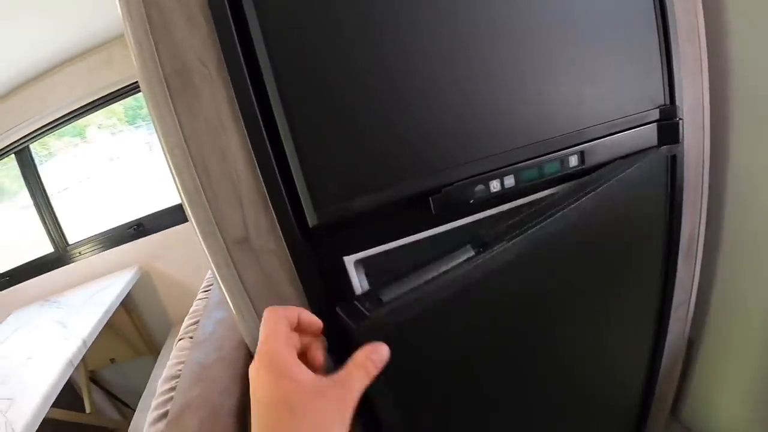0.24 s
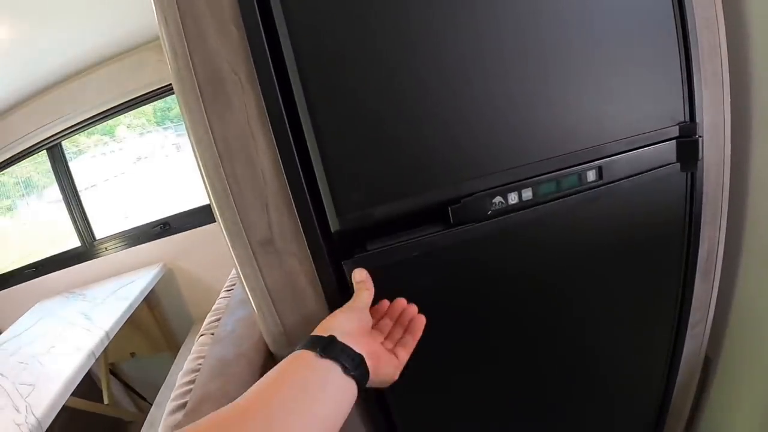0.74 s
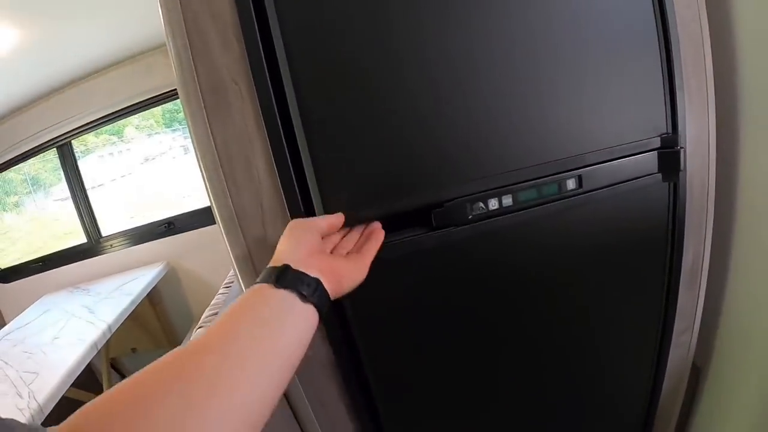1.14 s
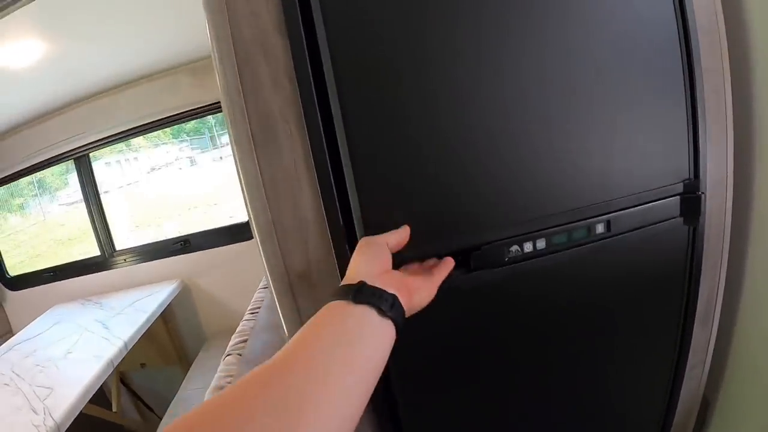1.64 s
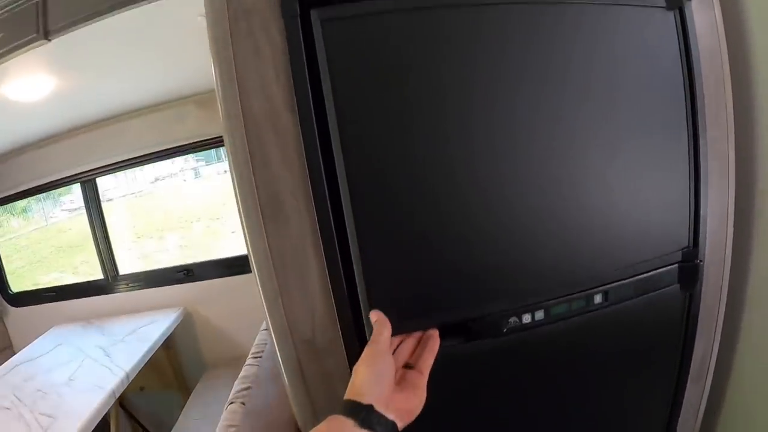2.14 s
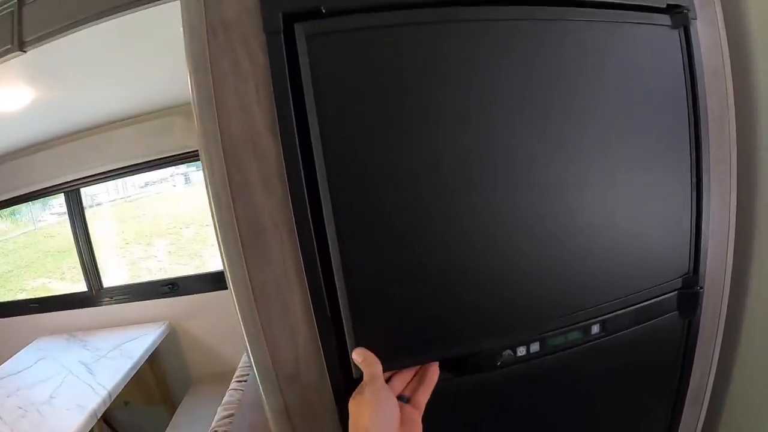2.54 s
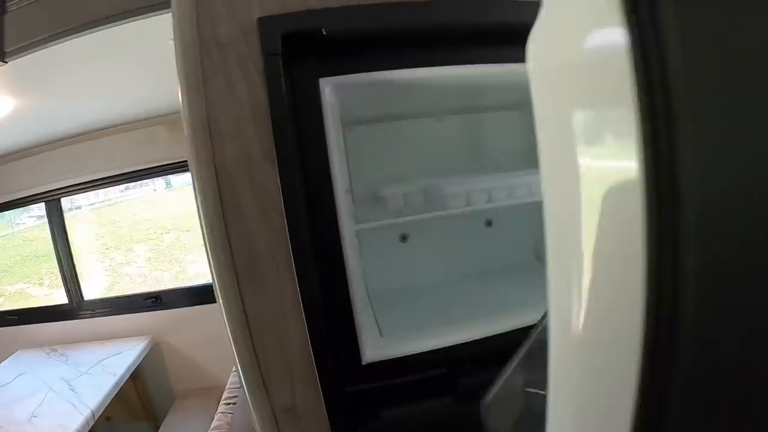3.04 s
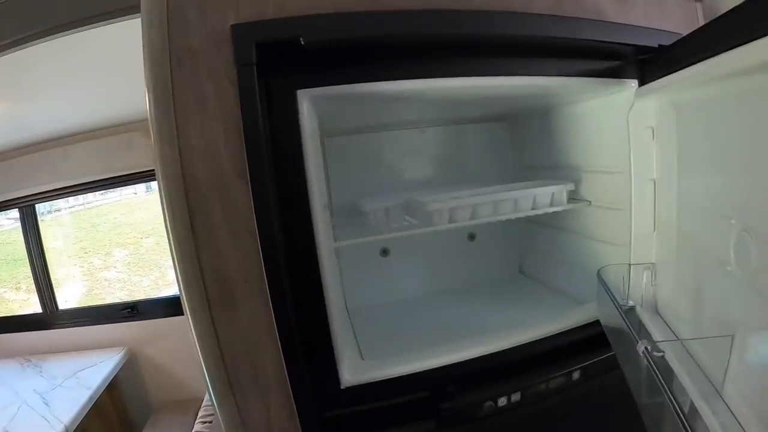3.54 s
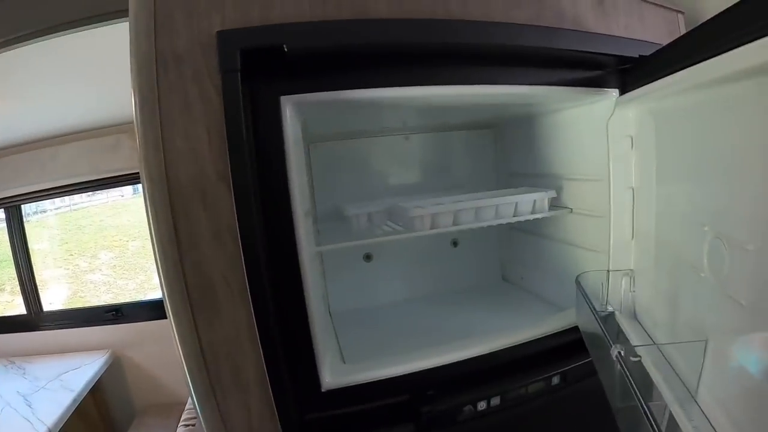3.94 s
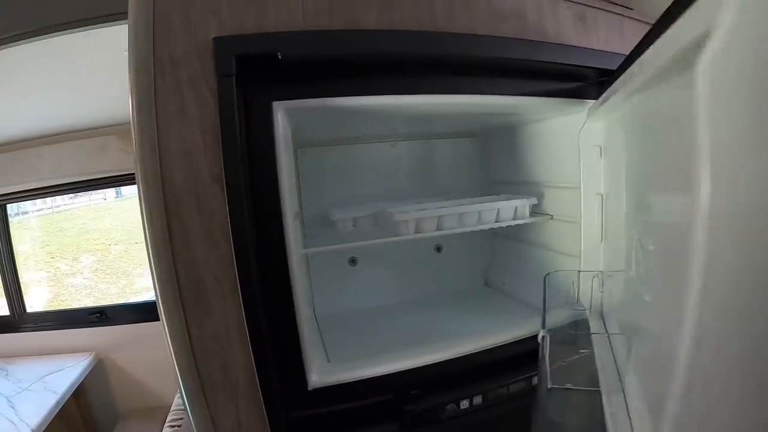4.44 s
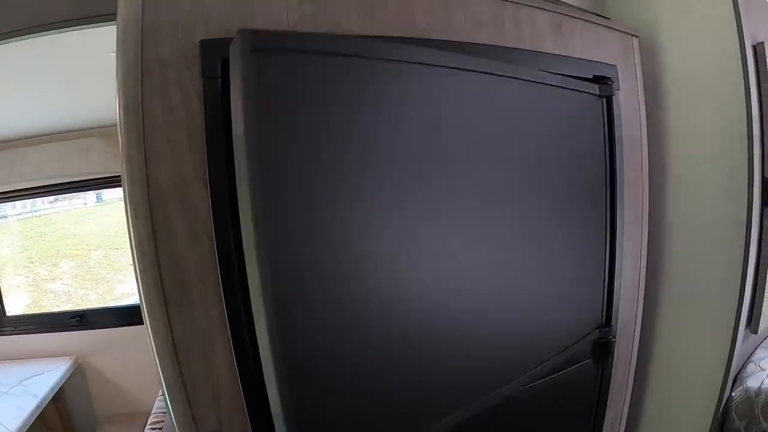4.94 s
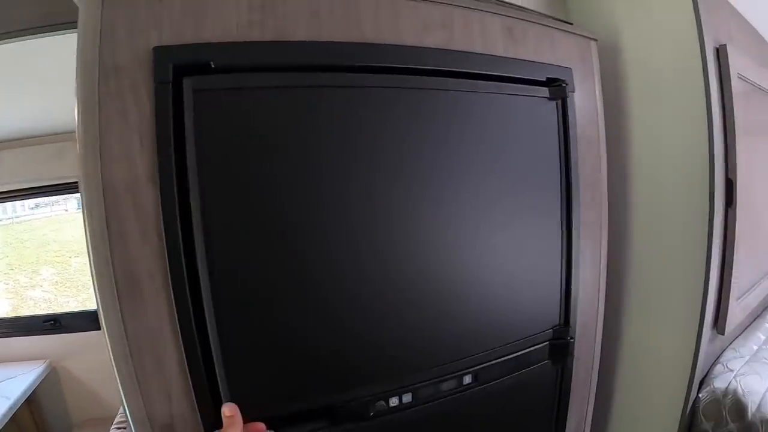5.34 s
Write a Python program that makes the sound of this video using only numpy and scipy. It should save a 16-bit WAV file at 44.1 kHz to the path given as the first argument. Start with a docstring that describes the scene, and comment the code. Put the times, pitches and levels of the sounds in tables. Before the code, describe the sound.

In a small, dry camper cabin, a fridge door closes with a soft thump and double latch clack. Fingers tap and scrape the plastic, a latch snaps, then a heavy clunk frees the freezer door. A quieter pause leaves low rumble and faint hum before a squeaky scrape, tap and sharp closing click. The stereo microphone is close, at arm's length.

```python
"""Fridge doors in a camper

A hand shuts the lower fridge door, lets the freezer latch snap, pulls that door open and shuts it again, at arm's length
in a small, dry cabin. Gaskets, panels and latches are noise bursts plus damped modes; knocks are sagging sines;
finger scrapes and squeaks are trains of slips feeding resonances. Moves rustle as shaped noise
over cabin air, a low rumble and two wavering tones."""
import sys
import numpy as np
from scipy import signal
from scipy.fft import rfft, irfft, next_fast_len
from scipy.io import wavfile
from scipy.ndimage import uniform_filter1d

SR = 44100
rng = np.random.default_rng(int(sys.argv[2]) if len(sys.argv) > 2 else 0)


def bounce(signal):
    """Save signal as a 16-bit WAV file at the path given by the first command-line argument."""
    frames = np.transpose(np.atleast_2d(signal))
    limited = np.clip(frames, -1, 1)
    pcm = np.round(limited * 32767).astype(np.int16)
    wavfile.write(sys.argv[1], SR, pcm)


N = 246127

TIME = np.arange(N) / SR
AGE = np.arange(next_fast_len(int(0.28 * SR), True)) / SR  # time since a contact
RELEASE = np.sin(np.pi / 2 * np.minimum(2 * (1 - AGE / AGE[-1]), 1)) ** 2  # fades the second half out

# parts of a blow, low to high: base range [Hz], base contact decay [s], cabin tail [dB, s],
# modes relative to the burst [dB], trim on the called level [dB]
PANEL_PART = dict(lo_hz=125, hi_hz=451.6, contact_t60=0.012, tail_db=-16.5, tail_t60=0.26, modes_db=3, trim_db=-0.5)
CLACK_PART = dict(lo_hz=808, hi_hz=2190, contact_t60=0.047, tail_db=-6.5, tail_t60=0.16, modes_db=-4, trim_db=-1.5)
SNAP_PART = dict(lo_hz=2120, hi_hz=5310, contact_t60=0.042, tail_db=-11, tail_t60=0.19, modes_db=-8.5, trim_db=-1.5)
EDGE_PART = dict(lo_hz=4600, hi_hz=8320, contact_t60=0.0099, tail_db=-16.5, tail_t60=0.17, modes_db=-18, trim_db=4.5)
# background whose air and low rumble change over time: (time [s], air level [dB], low rumble level [dB])
BACKGROUND_LEVELS = [(.45, -54.5, -38), (.9, -66.5, -41.5), (1.5, -56, -41.5), (3.2, -56.5, -43),
                     (4.12, -55, -44.5), (4.24, -55.5, -50.5), (4.68, -53, -46.5), (4.9, -52.5, -54)]


def undb(db):
    """Decibels to gain."""
    return 10 ** (np.asarray(db) / 20)


def curves(table):
    """Columns of a (time, ...) table interpolated at every sample."""
    s, *columns = np.transpose(table)
    return [np.interp(TIME, s, column) for column in columns]


def fade(t60_s):
    """Exponential decay of 60 dB in t60_s."""
    return np.exp(-np.log(1000) * AGE / t60_s)


def band(x, lo_hz, hi_hz, order):
    """Causal Butterworth band-pass."""
    hi_hz = np.clip(hi_hz, 1.1 * lo_hz, 0.45 * SR)
    return signal.sosfilt(signal.butter(order, [lo_hz, hi_hz], "band", fs=SR, output="sos"), x)


def diffuse(n, apart_hz, bass_side):
    """Noise from all around at two close ports: alike in the bass, unrelated in the treble."""
    mid, side = rng.standard_normal((2, n))
    share = np.clip(bass_side + np.fft.rfftfreq(n, 1 / SR) / apart_hz, 0, 1)
    side = irfft(rfft(side) * share, n)
    return np.array([mid + side, mid - side])


def wash(colour, apart_hz=2600, bass_side=0.036):
    """Diffuse noise of rms 1 with a (Hz, dB) colour, silent above its last point."""
    n = next_fast_len(N, True)
    hz, db = np.transpose(colour)
    log_hz = np.log(np.fft.rfftfreq(n, 1 / SR) + 1)
    gain = undb(np.interp(log_hz, np.log(hz), db, right=-np.inf))
    x = irfft(rfft(diffuse(n, apart_hz, bass_side)) * gain, n)[:, :N]
    return x / x.std()


def walk(rate_hz):
    """Smooth random drift of standard deviation 1."""
    k = int(SR / rate_hz)
    steps = np.repeat(rng.standard_normal(N // k + 1), k)
    x = uniform_filter1d(uniform_filter1d(steps, k), k)[:N]
    return x / x.std()


def crest(x, window_s):
    """Scale a sound so that its loudest window has rms 1."""
    power = np.mean(np.atleast_2d(x) ** 2, axis=0)
    loudest = uniform_filter1d(power, int(window_s * SR), mode="constant").max()
    return x / np.sqrt(loudest + 1e-18)


def add(out, s, x):
    """Mix a sound in at time s."""
    i = int(s * SR)
    out[:, i:i + x.shape[1]] += x[:, :N - i]


def in_cabin(x, db, t60_s):
    """A sound followed by the cabin's short diffuse tail."""
    cabin = diffuse(len(AGE), apart_hz=5500, bass_side=0.35) * fade(t60_s)
    cabin *= undb(db) / np.linalg.norm(cabin[0])
    cabin[:, 0] += 1  # direct sound
    return signal.fftconvolve(cabin, x[None])


def cabin_air():
    """Diffuse broadband noise whose level follows the background table."""
    # colour of the air: (frequency [Hz], level [dB])
    air_colour = [(120, -15.5), (200, 1), (259, -2), (394, -20), (696, -23), (883, -20.5), (986, -12),
                  (2960, -34), (5940, -44.5), (10300, -57.5), (16000, -98.5)]
    air_db, _ = curves(BACKGROUND_LEVELS)
    return wash(air_colour) * undb(air_db)


def wavering_tone(table, waver, flutter_db, trim_db=-2.5):
    """A sine that wavers in pitch (share) and level (dB), alike at both ports."""
    hz, db = curves(table)
    phase = 2 * np.pi * np.cumsum(hz * (1 + waver * walk(10.0))) / SR
    return np.sqrt(2) * np.sin(phase) * undb(db + flutter_db * walk(24) + trim_db)


def hums():
    """A low hum and a higher tone, each one wavering sine."""
    # low hum: (time [s], mean pitch [Hz], level before trim [dB])
    low_hum = [(0, 94.2, -46), (.9, 87.45, -52.5), (2.4, 96.2, -53.5), (3.2, 90, -51), (4.12, 85, -43),
               (4.235, 86, -60), (4.29, 105.5, -39), (4.5, 102.4, -45.5), (4.83, 103, -43.5),
               (4.89, 101.7, -69.5), (5.2, 107.8, -47.5), (5.58, 107.3, -43)]
    # higher tone, clearest near 3.3 s: (time [s], mean pitch [Hz], level before trim [dB])
    higher_tone = [(0, 256, -66.5), (2.4, 256.4, -60.5), (3.3, 243.8, -48.5), (3.9, 242.4, -52),
                   (4.3, 244, -70)]
    return (wavering_tone(low_hum, waver=0.012, flutter_db=1.6)
            + wavering_tone(higher_tone, waver=0.004, flutter_db=1.0))


def sliding(rustle_db=-4, body_db=-1, rumble_db=7.5, grain_db=1.5, move_range_db=19.5, steady_body_db=-60):
    """Each arm move rustles on the plastic and stirs the door by its weight; a rumble lies below."""
    # noise colours: (frequency [Hz], level [dB])
    rustle_colour = [(300, -8), (600, 7), (1100, 1.5), (1800, -3.5), (3000, -9.5), (5000, -15.5),
                     (8000, -24.5), (16000, -50)]
    body_colour = [(90, -18.5), (160, 6.5), (240, 3), (310, -6), (400, -4.5), (600, -14.5), (2000, -52)]
    rumble_colour = [(12, -8), (25, -3.5), (45, 5), (65, -1), (105, -2), (160, -14.5), (600, -63)]
    # arm moves: (time of most effort [s], rise [s], fall [s], effort [dB], door weight [dB])
    arm_moves = [(0, 0.14, 0.44, -48, -9), (0.65, 0.22, 0.23, -38.5, 3.5), (1.17, 0.16, 0.44, -48.5, -3.5),
                 (1.841, 0.24, 0.13, -44.5, -3), (2.741, 0.52, 0.43, -52.5, 4.5),
                 (3.28, 0.13, 0.19, -48, -1.5), (4.65, 0.57, 0.37, -58, 6), (5.26, 0.33, 0.15, -46, 6)]
    _, steady_rumble_db = curves(BACKGROUND_LEVELS)
    effort, stir = np.zeros((2, N))
    for s, rise_s, fall_s, db, weight_db in arm_moves:
        distance = np.maximum((s - TIME) / rise_s, (TIME - s) / fall_s)
        swell = undb(db - move_range_db * distance)  # gains, then loses, move_range_db
        effort += swell
        stir += swell * undb(weight_db)
    grip = undb(grain_db * walk(170))
    rustle = wash(rustle_colour) * grip * effort * undb(rustle_db)
    body = wash(body_colour) * np.hypot(stir * undb(body_db), undb(steady_body_db))
    rumble_gain = np.hypot(stir * undb(rumble_db), undb(steady_rumble_db))
    return rustle + body + wash(rumble_colour, bass_side=0.13) * rumble_gain


def ringing(lo_hz, hi_hz, favoured_hz, freedom, favour_db=12, scatter_db=2.0, port_phase_rad=0.12):
    """The fridge's modes in one range; the place of contact favours some, a pressing hand damps all."""
    # modes of the fridge: (frequency [Hz], level [dB], t60 when free [s])
    fridge_modes = [(52.5, -4.5, 0.039), (77, -15.5, 0.086), (148, -13.5, 0.29), (188, -3, 0.17),
                    (216.8, -2, 0.12), (258.9, -4, 0.18), (365, -15, 0.31), (382, -18, 0.12),
                    (455.7, -15, 0.21), (538.8, -8.5, 0.12), (780, -10.5, 0.26), (883, -5, 0.17),
                    (963, 0, 0.14), (1039, -3, 0.16), (1154, -4, 0.15), (1255, 2, 0.094), (1426, -4, 0.1),
                    (1790, -9, 0.047), (2345, -14.5, 0.19), (2665, 1.5, 0.086), (3250, -3, 0.13),
                    (3600, -2, 0.15), (3980, -12, 0.23), (5500, -14.5, 0.055), (7940, -2, 0.036)]
    hz, db, t60_s = np.transpose([m for m in fridge_modes if 0.78 * lo_hz < m[0] < 1.33 * hi_hz])
    count = len(hz)
    nearness = np.exp(-(np.log(hz / favoured_hz) / 0.08) ** 2)
    db = db + favour_db * nearness + scatter_db * rng.standard_normal(count)
    hz = hz * (1 + 0.012 * rng.standard_normal(count))
    phase = port_phase_rad * rng.standard_normal((count, 2, 1))  # differs slightly between ports
    total = np.zeros((2, len(AGE)))
    for k in range(count):
        sine = np.sin(2 * np.pi * hz[k] * AGE + phase[k])
        total += (-1) ** k * undb(db[k]) * sine * fade(t60_s[k] * freedom)
    return total


def strike(db, favoured_hz, contact_s, freedom, order, lo_hz, hi_hz, contact_t60, tail_db, tail_t60,
           modes_db, trim_db, grit_db=5):
    """One part of a blow: a gritty contact burst, the modes that it wakes and the cabin's short tail."""
    n = len(AGE)
    window_s = max(0.004, 2 / hi_hz)
    grit = undb(grit_db * rng.standard_normal(n))  # a few asperities carry most of the force
    grit /= np.sqrt(np.mean(grit ** 2))
    mono_burst = rng.standard_normal(n) * grit * fade(contact_t60 + 4 * contact_s)
    burst = np.array([np.roll(mono_burst, 1), mono_burst])  # the right port is one sample nearer
    tail = diffuse(n, apart_hz=5500, bass_side=0.27) * fade(tail_t60) * (1 - fade(0.033))
    tail *= undb(tail_db) * freedom
    dense = crest(band(burst + tail, lo_hz, hi_hz, order=order), window_s)
    push = mono_burst / np.linalg.norm(mono_burst) * 150 * contact_s  # a long contact keeps feeding the modes
    push[0] += 1
    modes = signal.fftconvolve(ringing(lo_hz, hi_hz, favoured_hz, freedom), push[None])[:, :n]
    modes = crest(band(modes, lo_hz / 10, 2 * hi_hz, order=2), window_s)
    onset = (1 - fade(1.6 * contact_s)) ** 2  # a long contact builds up slowly
    mixed = (dense + undb(modes_db) * modes) * onset * RELEASE
    return crest(mixed, window_s) * undb(db + trim_db)


def pulled(part, favoured_hz, mid_hz, pull):
    """A part of a blow with its range drawn towards the favoured mode."""
    stretch = (favoured_hz / mid_hz) ** pull
    return dict(part, lo_hz=part["lo_hz"] * stretch, hi_hz=part["hi_hz"] * stretch)


def pulled_clack(plastic_hz):
    """The clack range drawn towards the favoured plastic mode."""
    return pulled(CLACK_PART, plastic_hz, mid_hz=1306, pull=0.6)


def reach(clack_db, hardness_db, edge_db=-15, edge_per_hardness=0.39):
    """Levels of clack, snap and edge; a harder contact reaches further up."""
    snap_db = clack_db + hardness_db
    return clack_db, snap_db, snap_db + edge_db + edge_per_hardness * hardness_db


def touch(panel_db, clack_db, hardness_db, plastic_hz, contact_s, freedom=0.82, skin_db=-1, handle_panel_hz=391):
    """A contact of skin or loose plastic; skin dulls its edge."""
    clack_db, snap_db, edge_db = reach(clack_db, hardness_db)
    return (strike(panel_db, handle_panel_hz, contact_s, freedom, order=3, **PANEL_PART)
            + strike(clack_db, plastic_hz, contact_s, freedom, order=3, **pulled_clack(plastic_hz))
            + strike(snap_db, plastic_hz, contact_s, freedom, order=4, **SNAP_PART)
            + strike(edge_db + skin_db, plastic_hz, contact_s, freedom, order=2, **EDGE_PART))


def slips(length_s, count=128, slips_per_s=650, scatter_db=6, window_s=0.015):
    """An uneven train of slips that swells and dies; its strongest stretch has the energy of one touch."""
    when_s = (np.arange(count) + rng.random(count)) / slips_per_s
    size = rng.choice([-1, 1], count) * undb(scatter_db * rng.standard_normal(count))
    inside = when_s < length_s
    swell = np.sqrt(np.sin(np.pi * when_s[inside] / length_s))
    train = np.zeros(int(length_s * SR) + 1)
    train[(when_s[inside] * SR).astype(int)] = size[inside] * swell
    return crest(train, window_s) / np.sqrt(window_s * SR)


def fingers(tap_trim_db=-1, scrape_trim_db=-2, slip_contact_s=0.0013, scrape_panel_db=-4.5):
    """Single taps, and stick-slip scrapes in which each slip is a small touch."""
    # fingers, handle and shelf tap the doors; levels before trims:
    # (time [s], panel [dB], clack [dB], hardness [dB], favoured plastic mode [Hz])
    door_taps = [(0.002, -40, -43.5, -21.5, 1230), (0.996, -36, -44.5, -6, 1290),
                 (1.071, -39, -43.5, -4, 1440), (1.105, -36, -38, -8, 1430),
                 (1.133, -40.5, -31.5, -5, 1320), (1.191, -42, -37, -9, 1490),
                 (1.241, -37.5, -37.5, -3, 1008), (1.263, -39, -38, -4.5, 1020),
                 (1.724, -37, -39, -2, 1220), (1.776, -37, -38, -6.5, 1190), (1.869, -39, -35.5, -3, 1150),
                 (1.902, -42, -36, -2, 890), (1.931, -38, -33, -9.5, 1011), (2.319, -48, -40, -6.5, 1330),
                 (2.636, -33.5, -30, -12, 1014), (2.797, -42, -33.5, -9, 1300),
                 (3.260, -42.5, -32.5, -13, 1005), (3.272, -36, -33.5, -8.5, 1024),
                 (3.297, -62, -45.5, 7, 1002), (3.901, -57, -50.5, -1.5, 940),
                 (3.365, -45.5, -40.5, -16.5, 1003), (4.465, -58, -52.5, -14, 1470),
                 (5.024, -41, -30, -18.5, 1036), (5.097, -36, -35.5, -12.5, 1176),
                 (5.262, -35, -19, -10, 1320), (5.294, -35.5, -50, -13, 1185)]
    # skin and plastic stick and slip; levels before trims:
    # (start [s], length [s], clack [dB], hardness [dB], favoured plastic mode [Hz])
    skin_scrapes = [(0.16, 0.081, -58, 6.5, 1340), (0.445, 0.023, -29.5, -11.5, 1390),
                    (0.468, 0.15, -36, -7, 1100), (0.515, 0.025, -33.5, -21, 1680),
                    (0.999, .036, -45, -7, 1200), (1.074, 0.023, -37, -7, 1160),
                    (1.216, 0.022, -38.5, -3.5, 1110), (1.557, 0.063, -47.5, -8.5, 1290),
                    (1.801, 0.02, -35.5, -8, 1330), (1.837, 0.032, -34, -4, 1070),
                    (1.888, 0.011, -32.5, -2.5, 1110), (2.704, 0.078, -40.5, -14.5, 930),
                    (2.805, 0.039, -34.5, -13.5, 1270), (3.322, 0.031, -40, -22.5, 940),
                    (4.602, 0.013, -42, -20, 1320), (5.014, 0.018, -30.5, -9.5, 1130),
                    (5.142, 0.048, -27.5, -8, 1130)]
    out = np.zeros((2, N))
    for s, panel_db, clack_db, hardness_db, plastic_hz in door_taps:
        contact_s = 0.0026 * np.exp(0.1167 * hardness_db)
        add(out, s, touch(panel_db, clack_db, hardness_db, plastic_hz, contact_s) * undb(tap_trim_db))
    for s, length_s, db, hardness_db, plastic_hz in skin_scrapes:
        ring = touch(db + scrape_panel_db, db, hardness_db, plastic_hz, slip_contact_s)
        add(out, s, signal.fftconvolve(ring, slips(length_s)[None]) * undb(scrape_trim_db))
    return out


def knocks(cabin_db=-9, cabin_t60_s=0.18, rise_cycles=2.5, sag=0.062, sag_t60_s=0.08,
           overtone_ratio=1.65, overtone_db=-10):
    """Dull knocks of a flexing door, liner or racks; pitch starts sharp by the sag share and settles."""
    # knocks: (time [s], level [dB], settled pitch [Hz], t60 [s])
    panel_knocks = [(0.462, -39.5, 374, 0.18), (0.53, -43.5, 534, 0.12), (0.578, -27.5, 534, 0.074),
                    (0.59, -31.5, 377, 0.074), (0.644, -22, 230, 0.025), (0.737, -30, 448, 0.18),
                    (0.744, -24.5, 94, 0.094), (0.748, -28.5, 383.3, 0.2), (1.135, -42, 381, .16),
                    (1.869, -44, 464, 0.086), (1.927, -32, 95, 0.059), (2.579, -16.5, 1026, 0.052),
                    (2.615, -25.5, 54.7, 0.36), (2.715, -28, 88, 0.15), (2.867, -30.5, 93, .09),
                    (3.264, -39, 565, 0.098), (4.584, -53.5, 603, 0.08), (4.648, -51.5, 611, 0.1)]
    out = np.zeros((2, N))
    for s, db, hz, t60_s in panel_knocks:
        phase = 2 * np.pi * np.cumsum(hz * (1 + sag * fade(sag_t60_s))) / SR
        ratio = overtone_ratio * np.exp(0.08 * rng.standard_normal())
        overtone = np.sin(phase * ratio) * undb(overtone_db) * fade(2 * t60_s)  # shorter than the main mode
        ring = (np.sin(phase) + overtone) * fade(t60_s) * (1 - fade(rise_cycles / hz)) * RELEASE
        add(out, s, crest(in_cabin(ring, cabin_db, cabin_t60_s), 2 / hz) * undb(db))
    return out


def blow(levels_db, panel_hz, plastic_hz, freedom, soft_s=0.0031, hard_s=0.00068):
    """A soft push on the door and a hard one on its plastic."""
    # lowest part of a blow, columns as in PANEL_PART: [Hz], [s], [dB, s], [dB], [dB]
    thump_part = dict(lo_hz=30, hi_hz=95, contact_t60=.04, tail_db=-12, tail_t60=.4, modes_db=7, trim_db=0)
    thump_db, panel_db, clack_db, snap_db, edge_db = levels_db
    panel_part = pulled(PANEL_PART, panel_hz, mid_hz=236, pull=0.39)
    return (strike(thump_db, panel_hz, soft_s, freedom, order=3, **thump_part)
            + strike(panel_db, panel_hz, soft_s, freedom, order=3, **panel_part)
            + strike(clack_db, plastic_hz, hard_s, 1.0, order=3, **pulled_clack(plastic_hz))
            + strike(snap_db, plastic_hz, hard_s, 0.94, order=3, **SNAP_PART)
            + strike(edge_db, plastic_hz, hard_s, 0.73, order=2, **EDGE_PART))


def doors(latch_freedom=0.98, thud_plastic_hz=1100, lead_s=0.018, lead_db=-22, lead_hardness_db=-10.5):
    """Gaskets thump; a faint short scrape leads into each latch, which snaps over in two quick steps."""
    # door landing on its gasket or tugging free, levels before part trims: (time [s], thump [dB], panel [dB],
    # clack [dB], hardness [dB], favoured panel mode [Hz], freedom to ring [0-1])
    gasket_thuds = [(0.574, -29, -38.5, -36.5, 1, 528, 0.8), (0.6286, -24.5, -28, -29.5, -22, 520, 0.8),
                    (0.648, -23, -17, -53, -3.5, 221, 1), (1.925, -25, -28.5, -52, 3.5, 186, 0.78),
                    (2.865, -26, -36, -62, -19, 190, 1), (5.181, -32.5, -25, -28, -1.5, 260, 1),
                    (5.236, -38, -23, -36.5, -15, 245, 1)]
    # latch over its catch, levels before part trims: (time [s], delay of second step [s], thump [dB], panel [dB],
    # clack [dB], hardness [dB], favoured panel mode [Hz], favoured plastic mode [Hz])
    latch_snaps = [(0.643, 0.0027, -18, -14, -18.5, -9, 226, 1420),
                   (0.729, 0.0046, -31, -19.5, -20, 1.5, 432, 1117),
                   (1.3246, 0.0029, -28.5, -18, -15, -6, 199, 1260),
                   (2.5779, 0.0014, -16, -11, -18, -4.5, 257, 1001),
                   (5.372, .0041, -36, -24.5, -15.5, -1.5, 265, 1036)]
    # lighter, sharper first step, relative to the second: (thump, panel, clack, snap, edge) [dB]
    first_step_db = (-19, -10, -5, -1.5, 5.5)
    out = np.zeros((2, N))
    for s, thump_db, panel_db, clack_db, hardness_db, panel_hz, freedom in gasket_thuds:
        levels_db = (thump_db, panel_db, *reach(clack_db, hardness_db))
        add(out, s, blow(levels_db, panel_hz, thud_plastic_hz, freedom))
    for s, step_s, thump_db, panel_db, clack_db, hardness_db, panel_hz, plastic_hz in latch_snaps:
        levels_db = np.array([thump_db, panel_db, *reach(clack_db, hardness_db)])
        scrape = touch(panel_db + lead_db, clack_db + lead_db, lead_hardness_db, plastic_hz, lead_s / 2)
        add(out, s - lead_s, scrape)
        add(out, s, blow(levels_db + first_step_db, panel_hz, plastic_hz, latch_freedom))
        add(out, s + step_s, blow(levels_db, panel_hz, plastic_hz, latch_freedom))
    return out


def squeaks(cabin_db=-4, cabin_t60_s=0.15, width_hz=230):
    """Slips ring a narrow resonance of the contact, which glides as the grip tightens or eases."""
    # fingertip, hinge or sliding latch: (start [s], length [s], level [dB], start pitch [Hz], end pitch [Hz])
    contact_squeaks = [(1.773, 0.012, -39, 1370, 1210), (1.838, 0.011, -34.5, 2280, 2050),
                       (1.883, 0.019, -37, 2280, 3030), (2.555, 0.0057, -35.5, 1140, 1000),
                       (4.244, 0.015, -45.5, 950, 973), (4.536, 0.0077, -49.5, 996, 860),
                       (4.63, 0.0155, -51, 1860, 1640), (4.748, 0.032, -79.5, 10160, 9500),
                       (5.14, 0.014, -31, 1250, 1530), (5.154, 0.018, -33, 1610, 2400)]
    out = np.zeros((2, N))
    for s, length_s, db, from_hz, to_hz in contact_squeaks:
        train = slips(length_s)
        train = np.pad(train, (0, len(AGE) - len(train)))
        glide_hz = np.interp(AGE, [0, length_s], [from_hz, to_hz])
        turn = np.exp(2j * np.pi * np.cumsum(glide_hz) / SR)
        # one-pole resonance in the frame that turns with the glide
        ring = turn * signal.lfilter([1], [1, -np.exp(-np.pi * width_hz / SR)], train / turn)
        ring = band(ring.imag, from_hz / 2, 2 * to_hz, order=2)
        add(out, s, crest(in_cabin(ring, cabin_db, cabin_t60_s), 0.004) * undb(db))
    return out


def scene():
    """The doors and the hand over the cabin's hum and air."""
    return cabin_air() + hums() + sliding() + fingers() + knocks() + doors() + squeaks()


def record(dry, shade_hz=9000, shade=0.26, port_lo_hz=11600, port_hi_hz=13400, port_db=(-6, 4),
           headroom=1.15, top_hz=15800):
    """The left port is shaded in the treble, both ports resonate near the top; peaks are rounded, the top is cut."""
    treble = signal.sosfilt(signal.butter(1, shade_hz, "high", fs=SR, output="sos"), dry)
    ports = dry + shade * treble * np.array([[-1], [1]]) / 2
    ports = ports + undb(port_db)[:, None] * band(ports, port_lo_hz, port_hi_hz, order=1)
    rounded = headroom * np.tanh(ports / headroom)
    return signal.sosfilt(signal.ellip(8, 0.2, 70, top_hz, fs=SR, output="sos"), rounded)


dry = scene()
out = record(dry)
bounce(out)
```